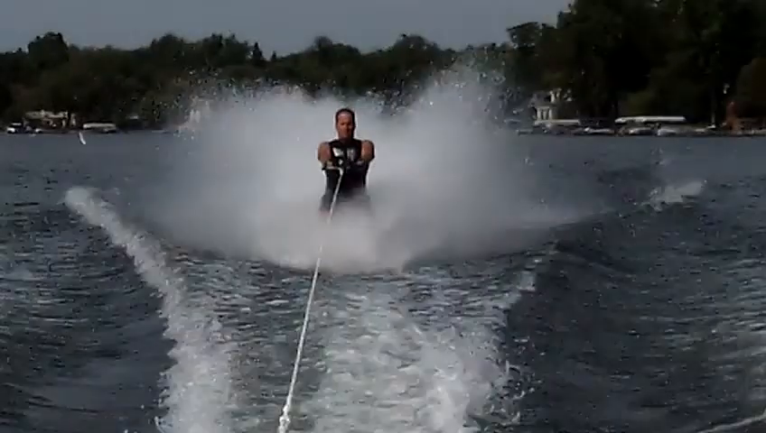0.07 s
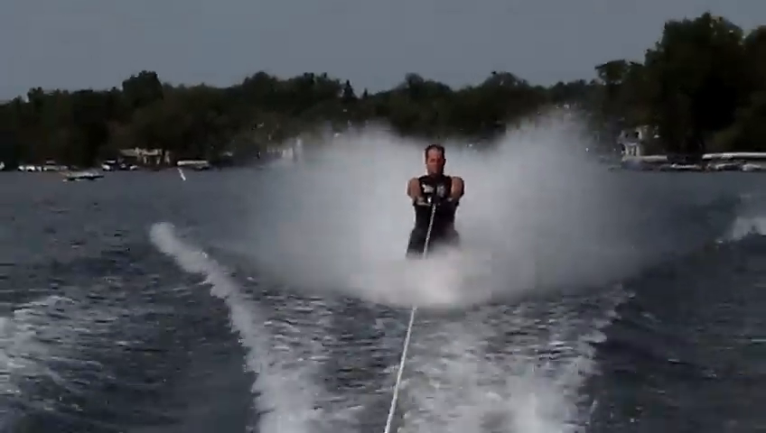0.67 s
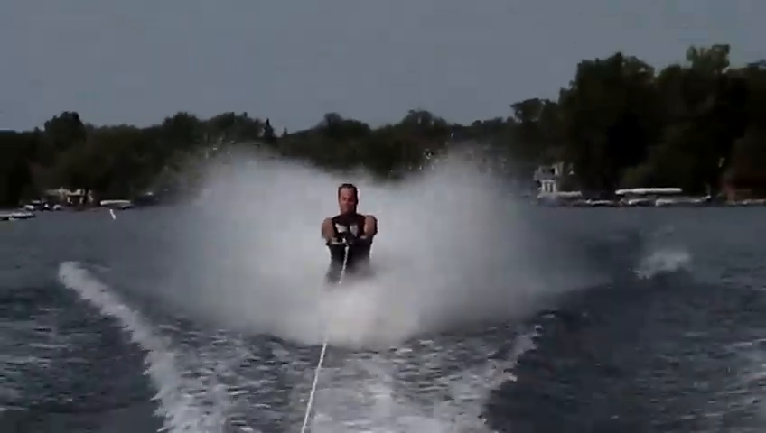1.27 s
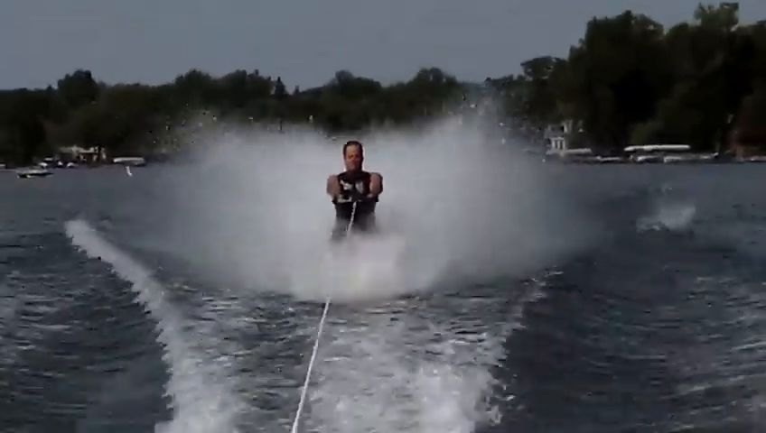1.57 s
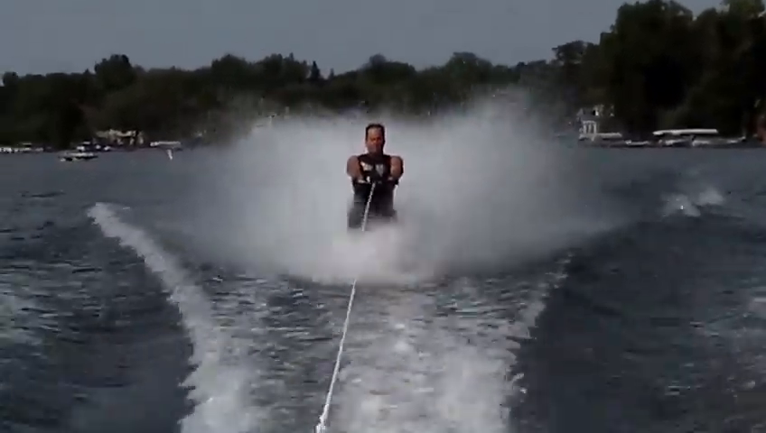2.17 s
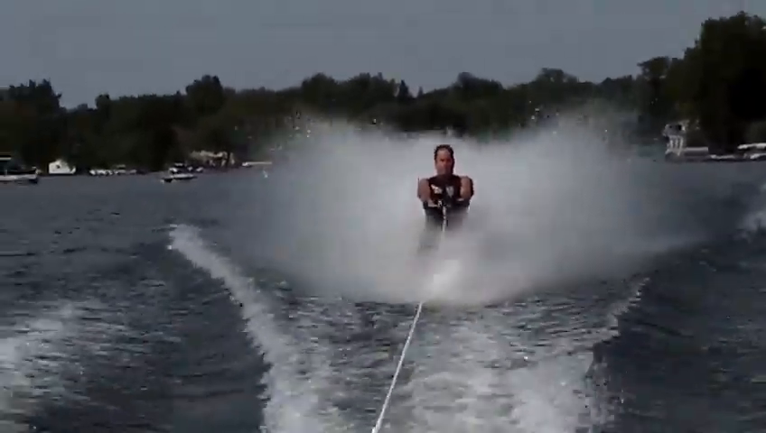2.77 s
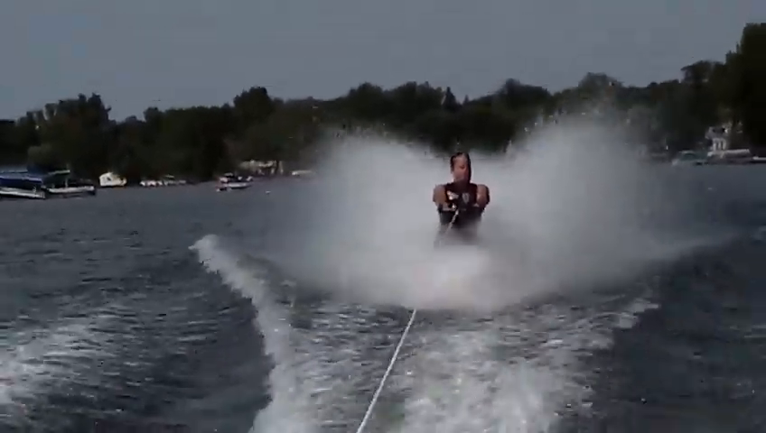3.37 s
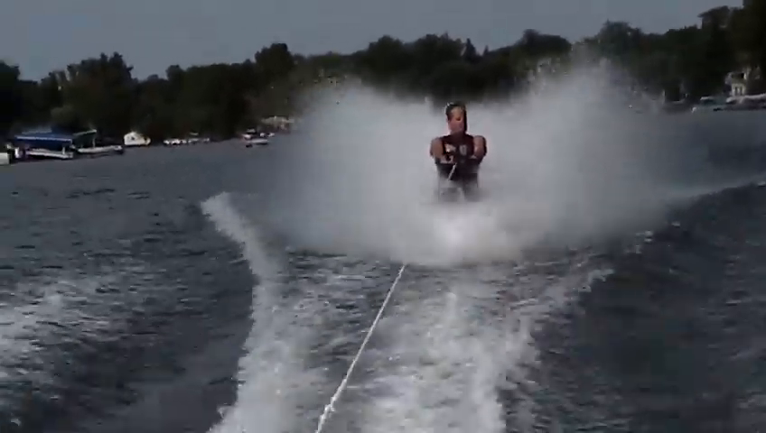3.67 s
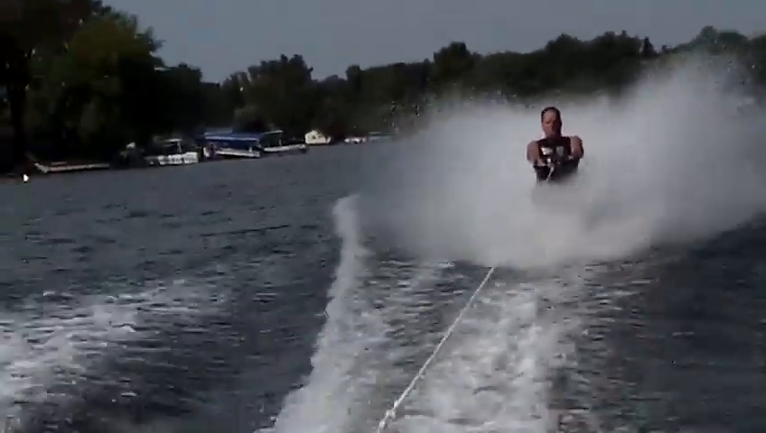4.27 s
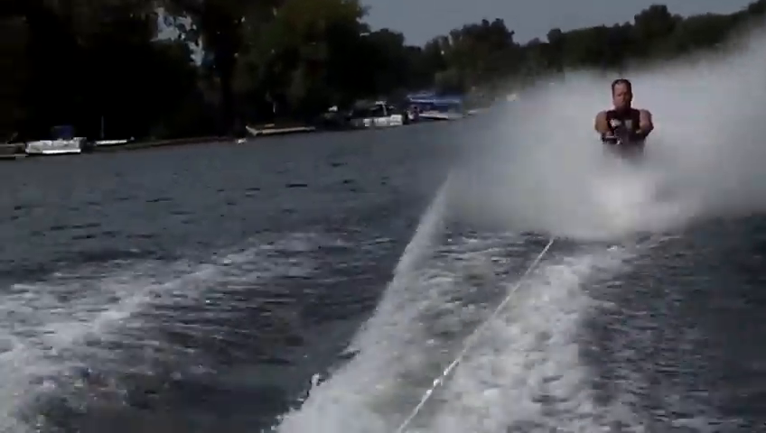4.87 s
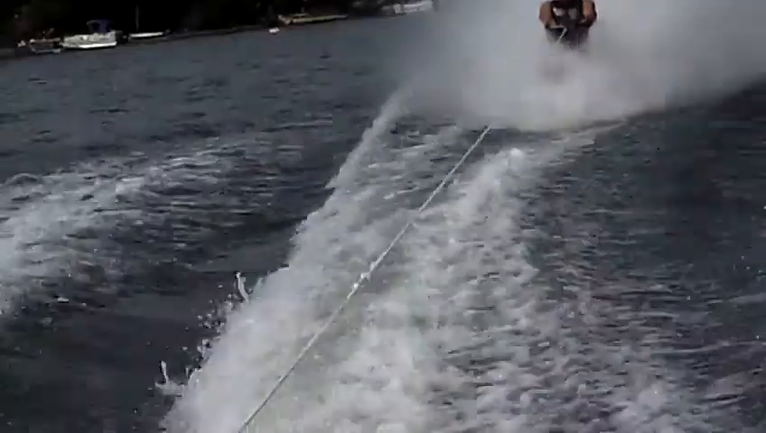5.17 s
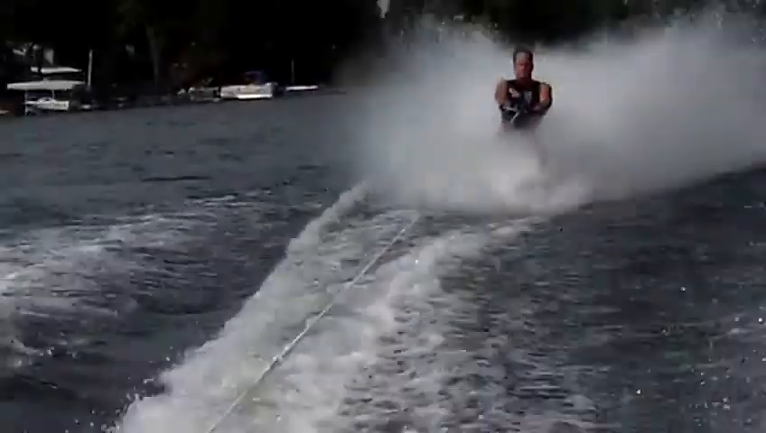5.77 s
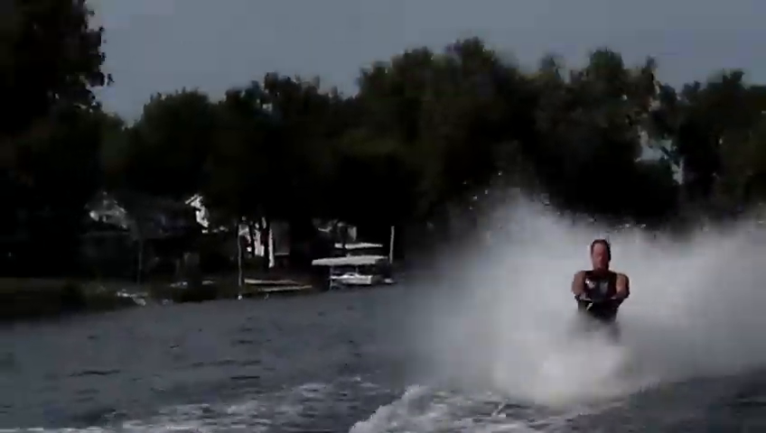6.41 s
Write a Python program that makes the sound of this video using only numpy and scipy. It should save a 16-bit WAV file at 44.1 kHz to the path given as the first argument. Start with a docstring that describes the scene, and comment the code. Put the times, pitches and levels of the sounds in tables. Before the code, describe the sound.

Strong wind buffets and sputters on the microphone over a steadily droning tow boat engine and the rush of its wake.

```python
"""A tow boat crosses a lake at steady speed, heard by a microphone at the stern.
From the start the engine drones under the rush of the wake, and gusts buffet the microphone.
Their pressure swings pin it at its limit: the sound sputters, stalls for milliseconds and thuds back.
Near 1.7 s the exhaust hum peaks and the airstream stiffens; by 3 s the engine is a little softer.
Gusts, stalls and the slaps of sharp eddies go on in clusters to the end, at 6.4 s."""
import sys
import numpy as np
from scipy.fft import rfft, irfft, next_fast_len
from scipy.io import wavfile
from scipy.ndimage import uniform_filter1d, map_coordinates

SR = 44100
rng = np.random.default_rng(int(sys.argv[2]) if len(sys.argv) > 2 else 0)


def output_pcm(signal):
    """Save a mono or channel-first signal as 16-bit PCM at the path in sys.argv[1].

    Samples are clipped to [-1, 1] before scaling.
    """
    pcm = np.clip(np.atleast_2d(signal).T, -1, 1) * 32767
    wavfile.write(sys.argv[1], SR, np.round(pcm).astype(np.int16))


N = 284004

# distinct single overloads of the microphone: centre t/s, length/s
STALLS = [(0.104, 0.008), (0.35, 0.008), (0.387, 0.004), (0.404, 0.008), (0.418, 0.009), (0.579, 0.004),
          (0.644, 0.006), (0.664, 0.006), (0.716, 0.005), (0.862, 0.006), (0.883, 0.012), (0.986, 0.005),
          (1.0, 0.004), (1.04, 0.008), (1.064, 0.007), (1.075, 0.005), (1.113, 0.005), (1.202, 0.006),
          (1.222, 0.012), (1.256, 0.019), (1.282, 0.012), (1.301, 0.009), (1.339, 0.005), (1.484, 0.005),
          (1.604, 0.006), (1.711, 0.003), (1.732, 0.004), (2.005, 0.007), (2.037, 0.01), (2.219, 0.011),
          (2.233, 0.005), (2.248, 0.006), (2.269, 0.008), (2.394, 0.004), (2.433, 0.005), (2.457, 0.017),
          (2.533, 0.01), (2.573, 0.01), (2.588, 0.004), (2.607, 0.012), (2.79, 0.004), (2.799, 0.01),
          (2.928, 0.009), (2.984, 0.009), (3.009, 0.004), (3.02, 0.005), (3.032, 0.01), (3.094, 0.004),
          (3.105, 0.009), (3.159, 0.01), (3.175, 0.01), (3.196, 0.007), (3.211, 0.011), (3.483, 0.009),
          (3.497, 0.007), (3.524, 0.006), (3.593, 0.005), (3.693, 0.004), (3.742, 0.006), (3.765, 0.012),
          (3.83, 0.011), (3.849, 0.004), (3.86, 0.006), (3.872, 0.007), (3.888, 0.015), (3.915, 0.006),
          (3.927, 0.009), (3.938, 0.007), (3.995, 0.017), (4.069, 0.007), (4.08, 0.004), (4.207, 0.005),
          (4.226, 0.003), (4.245, 0.005), (4.306, 0.007), (4.364, 0.008), (4.386, 0.014), (4.432, 0.008),
          (4.49, 0.005), (4.517, 0.01), (4.529, 0.01), (4.591, 0.005), (4.722, 0.003), (4.792, 0.008),
          (4.815, 0.011), (4.832, 0.011), (4.873, 0.004), (4.901, 0.005), (4.919, 0.008), (5.041, 0.006),
          (5.084, 0.012), (5.202, 0.007), (5.239, 0.01), (5.349, 0.006), (5.368, 0.006), (5.444, 0.005),
          (5.471, 0.009), (5.495, 0.018), (5.652, 0.004), (5.72, 0.004), (5.732, 0.004), (5.834, 0.008),
          (5.865, 0.005), (6.087, 0.009), (6.104, 0.005), (6.122, 0.004), (6.22, 0.008), (6.257, 0.009),
          (6.332, 0.004), (6.36, 0.01), (6.405, 0.008)]
# spectral density of the sharpest eddies' spitting: f/Hz, relative level/dB
SPIT_SPECTRUM = [(600, -16), (2000, 11), (4000, -7), (7000, -15.5), (11000, -20.5), (16000, -22.5)]


def amp(db):
    """The amplitude ratio of a level in decibels."""
    return 10 ** (np.asarray(db) / 20)


def unit(x):
    """Normalisation to an overall rms of 1."""
    return x / np.sqrt(np.mean(x ** 2) + 1e-20)


def even(x, span_s=0.01):
    """Division by the envelope holds the short-time rms near 1."""
    power = uniform_filter1d(x ** 2, max(int(span_s * SR), 2))
    return x / np.sqrt(np.abs(power) + 1e-9)


def clock():
    """The time t/s of every sample."""
    return np.arange(N) / SR


def around(s, reach_s):
    """The samples within reach_s of time s."""
    return slice(max(int((s - reach_s) * SR), 0), int((s + reach_s) * SR))


def curves(rows):
    """Linear interpolation: one value per sample for each column after the time."""
    times, *columns = np.transpose(rows)
    return [np.interp(clock(), times, column) for column in columns]


def swell(s, length):
    """A half-cosine window from 0 to 1 and back, centred on time s."""
    return np.cos(np.pi * np.clip((clock() - s) / length, -.5, .5))


def wobble(rate):
    """Smooth random modulation: a spline through rate Gaussian knots a second."""
    return map_coordinates(rng.standard_normal(4096), [clock() * rate], mode="wrap")


def scattered(rate_db, draws):
    """Inverse-transform sampling: uniform draws become times that crowd where the rate is high."""
    cumulative = np.cumsum(amp(rate_db))
    return np.interp(draws, cumulative / cumulative[-1], clock())


def filtered(x, response):
    """Linear filtering: the spectrum of x times a complex frequency response."""
    size = next_fast_len(N + 8192)
    return irfft(rfft(x, size) * response(np.fft.rfftfreq(size, 1 / SR)), size)[:N]


def noise(spectrum):
    """Spectral shaping of white noise to rows of f/Hz, relative level/dB; the rms is 1."""
    f, db = np.transpose(spectrum)
    shape = lambda hz: amp(np.interp(np.log(hz + 1), np.log(f), db))
    return unit(filtered(rng.standard_normal(N), shape))


def wake(level_db=-35.0, surge_db=0.62, froth_db=1):
    """Incoherent sources sum to noise: churned water rushes, and collapsing foam makes it flicker."""
    # spectral density of churned water: f/Hz, relative level/dB
    water_spectrum = [(60, -24.5), (200, 3), (500, 2), (900, 0), (1400, -3.5), (1900, -10), (3000, -15.5),
                      (4500, -22.5), (6500, -35), (9000, -41.5), (12000, -48.5), (16000, -47)]
    return amp(level_db + surge_db * wobble(3.19) + froth_db * wobble(70)) * noise(water_spectrum)


def engine(shaft_hz=68.35, drift=0.00094, whine_db=1.0, drone_db=-37, flutter_db=-0.3):
    """Engine orders: exhaust, whine and drone lock to one shaft, whose speed wanders with the load."""
    # course of the three parts: t/s, exhaust gain/dB, whine gain/dB, drone gain/dB
    gains = [(0, 0, 4, 5), (1.7, 2.5, 2.5, 3.5), (3.0, -2, 1, -1), (6.44, -3, 1, -1)]
    # exhaust partials of six cylinders firing three times a turn: shaft order, level/dB
    exhaust_orders = [(3, -25.5), (6, -40), (9, -49.5), (10, -53), (11, -48), (13, -52.5)]
    # partials of the mechanical whine: shaft order, level/dB
    whine_orders = [(12.5, -61.5), (16, -53.5), (17, -65.5), (17.5, -62.5), (18.5, -63), (19.5, -59),
                    (20, -53), (20.5, -53.5), (22, -56)]
    exhaust_gain, whine_gain, drone_gain = curves(gains)
    turns = np.cumsum(shaft_hz * (1 + drift * wobble(5.02))) / SR

    def tone(order):
        """An amplitude-modulated sinusoid at a multiple of the shaft frequency."""
        flutter = amp(flutter_db * wobble(23))
        return flutter * np.sqrt(2) * np.sin(2 * np.pi * (order * turns + rng.random()))

    exhaust = amp(exhaust_gain) * sum(amp(db) * tone(order) for order, db in exhaust_orders)
    whine = amp(whine_gain + whine_db) * sum(amp(db) * tone(order) for order, db in whine_orders)
    drone = amp(drone_gain + drone_db) * tone(order=8)
    return exhaust + whine + drone


def airflow(surge_db=2.5):
    """Unsteady flow: gusts and surges on the airstream set the gain/dB of large and of small eddies."""
    # airstream between gusts: t/s, relative level/dB
    airstream = [(0, -3), (.85, -3), (1.7, 1.5), (2.25, -2), (3.1, 1), (3.65, -1.5), (4.4, 1.03),
                 (5.0, 0.62), (5.55, -1), (6.0, 1), (6.44, 1)]
    # gusts that swell and fade: centre t/s, length/s, rumble rise/dB, turbulence rise/dB
    gusts = [(0.078, .12, 8.5, 10), (0.38, .08, 7, 10), (0.6, .2, 12, 9), (1.176, .17, 6, 10),
             (1.453, .11, 13.5, 7), (1.645, .22, 1.5, 1.5), (2.113, .06, -3, 12.5), (2.364, .1, 4.5, 12),
             (2.733, .16, 5.5, 7.5), (2.889, .1, 6, 4), (3.018, .16, 4.5, 3.5), (3.274, .22, 5, 3),
             (3.427, .08, 6.5, 3), (3.52, .13, 7, 6.5), (3.801, .1, 7.5, 12), (4.253, .07, 7.5, 6),
             (4.36, .15, 5, 5), (4.465, 0.073, 2.5, 5.5), (4.707, .2, 1, 3), (5.103, .16, 4.5, 4),
             (5.313, .08, 10.5, 8), (5.406, .08, 6.5, 7), (5.76, .17, 3, 6), (6.014, .17, 6.5, 7),
             (6.216, .08, 6.5, 5), (6.327, .1, 9, 5)]
    # surges that stir all eddies at once: centre t/s, length/s, strength (0-1)
    surges = [(0.4, 0.12, 0.6), (0.656, .07, 0.99), (1.014, 0.079, 1), (1.249, 0.095, 0.86),
              (2.015, .06, 0.64), (2.239, 0.045, 0.96), (2.582, 0.23, 0.59), (3.016, 0.063, 1),
              (3.183, .08, 0.92), (3.491, 0.06, 0.82), (3.886, .23, 1), (4.386, .15, .6), (4.822, .08, .7),
              (4.906, .06, 0.4), (5.225, 0.083, 0.78), (5.467, 0.085, .9), (5.743, .04, 0.7),
              (6.223, 0.096, 0.95)]
    steady, = curves(airstream)
    stirred = surge_db * sum(strength * swell(s, length) for s, length, strength in surges)
    gusting = sum(np.outer(rises, swell(s, length)) for s, length, *rises in gusts)
    return steady + stirred + gusting


def wind(rumble_db=-9.0, turbulence_db=-32, spit_db=-70, lumps_db=5.0, flurry_db=1.5, scatter_db=5):
    """Turbulent pressure: large eddies rumble, small ones come in flurries, and the sharpest spit."""
    # spectral densities of the large and the small eddies: f/Hz, relative level/dB
    rumble_spectrum = [(8, -2), (20, 15), (35, 11), (60, 10.5), (120, 3), (200, -4), (320, -9), (600, -22),
                       (1500, -74.5), (5000, -110)]
    turbulence_spectrum = [(60, -44.5), (160, -16), (280, -8), (450, -7.5), (700, -13), (1200, -32),
                           (2500, -35), (6000, -75), (16000, -99)]
    large_gain, small_gain = airflow()
    lumps = lumps_db * np.minimum(wobble(45), 1)
    flicker = np.minimum(wobble(260), 2)
    rumble = unit(amp(lumps) * even(noise(rumble_spectrum), span_s=0.073))
    flurries = unit(amp(lumps + flurry_db * flicker) * noise(turbulence_spectrum))
    spit = unit(amp(scatter_db * flicker) * noise(SPIT_SPECTRUM))
    return (amp(large_gain + rumble_db) * rumble
            + amp(small_gain + turbulence_db) * flurries
            + amp(small_gain + spit_db) * spit)


def stutters(pressure, count=62, mean_length_s=.0018):
    """Brief overloads on pressure crests between stalls, mostly in gusts: centre t/s, length/s."""
    t = clock()
    when, size = rng.random((count, 2)).T
    swing = np.abs(uniform_filter1d(pressure, size=SR // 200))
    times = scattered(1.5 * airflow()[1], (np.arange(count) + when) / count)
    windows = [around(s, .004) for s in times]
    crests = np.array([t[near][np.argmax(swing[near])] for near in windows])
    centres, lengths = np.transpose(STALLS)
    between_stalls = np.all(np.abs(crests[:, None] - centres) > lengths / 2 + mean_length_s, axis=1)
    return np.column_stack([crests, mean_length_s * (.5 + size)])[between_stalls]


def overloaded(pressure, limit=0.57, push=1.7, ramp_s=.00326, lead_s=.001147, dull_db=-32, dull_hz=450):
    """Saturation: slow swings carry the pressure past the limit and choke what rides on them."""
    t, driven = clock(), pressure.copy()
    side, released = 1, -1
    for s, length in sorted(map(tuple, np.vstack([stutters(pressure), STALLS]))):
        near = around(s, .025)
        nearness = np.clip(1 - (np.abs(t[near] - s) - length / 2 + lead_s) / ramp_s, 0, 1)
        grip = np.sin(np.pi / 2 * nearness) ** 2
        slow = uniform_filter1d(driven[near], size=SR // 400)
        gap_s = s - length / 2 - released
        # just after a stall the pressure rebounds to the other limit; else it goes the way it leans
        side = -side if .003 < gap_s < .008 else np.sign(np.sum(grip * slow))
        driven[near] += grip * (side * push * limit - slow)
        released = s + length / 2
    # a faint low-passed copy of the sound is added, so stalls are not fully silent
    dull_copy = amp(dull_db) * filtered(pressure, lambda hz: 1 / (1 + (hz / dull_hz) ** 2))
    return np.clip(driven, -limit, limit) + dull_copy


def small_eddies(thump_db=-15, burst_db=-28, snap_db=-21, scatter_db=8, count=40):
    """Intermittency: weak eddies strike at random, mostly in gusts: t/s, thump/dB, burst/dB, snap/dB."""
    when, size, sharpness = rng.random((count, 3)).T
    times = scattered(2 * airflow()[1], (np.arange(count) + when) / count)
    size_db = scatter_db * (size - .5)
    sharpness_db = 2 * scatter_db * (sharpness - .5)
    return np.column_stack([times, thump_db + size_db, burst_db + size_db, snap_db + sharpness_db])


def buffets(pressure, thump_db=-3, burst_db=1, slap_db=10, snap_db=-3, rasp_db=-29):
    """Eddies break on the microphone port as pressure pulses: the shorter, the wider the spectrum."""
    # impacts of the sharpest eddies: t/s, relative level/dB of thump, of burst and of snap
    impacts = [(.089, 6, -19, -16), (.377, 4, -18.5, -12.5), (.538, -4, -24, -21), (.574, -13, -18, -21.5),
               (.586, 4.5, -26.5, -17), (.634, -1, -19.5, -13), (1.022, 7.5, -21.5, -13),
               (1.095, -14, -20.5, -9), (1.122, 2.5, -21.5, -24.5), (1.183, 1, -17, -24),
               (1.193, -4, -24.5, -25), (1.331, -13, -20.5, -24.5), (1.427, -1, -18.5, -12),
               (1.461, 5, -29.5, -17.5), (1.47, 5, -27.5, -13), (1.548, 9, -20.5, -18),
               (1.591, 5, -21, -14), (1.618, 1, -28, -15.5), (1.632, -6, -19, -14),
               (1.719, 7.5, -19.5, -8.5), (2.111, 4.5, -13.5, -12), (2.357, -2.5, -13, -14.5),
               (2.663, -3, -20.5, -16), (2.701, 2, -25, -20.5), (2.735, 0, -22, -21), (2.759, 8, -19, -12),
               (2.772, -3.5, -16.5, -13), (2.957, -22, -20.5, -14.5), (2.995, 3, -22.5, -30),
               (3.014, -11, -24, -17.5), (3.064, 3.5, -29, -18.5), (3.135, -8, -21, -13.5),
               (3.166, 5.5, -21, -10.5), (3.185, 5.5, -27, -20), (3.229, -2, -23.5, -19),
               (3.31, 5, -25, -15), (3.534, 2, -22.5, -12.5), (3.555, 4.5, -17.5, -18),
               (3.736, 3.5, -23.5, -13.5), (3.785, 6.5, -18, -5.5), (3.793, -13.5, -15.5, -28),
               (3.805, 11, -26, -9), (3.933, 3.5, -22.5, -10), (4.115, 5.5, -22.5, -13),
               (4.233, 4.5, -15.5, -7.5), (4.353, 4, -18, -26), (4.397, 6.5, -23.5, -20.5),
               (4.477, -5, -20, -20.5), (4.617, 8, -21, -18), (4.682, 1, -18, -14), (4.699, -8, -20, -27),
               (4.714, -7.5, -21.5, -9.5), (4.768, 3.5, -19.5, -10.5), (4.878, 4.5, -18.5, -11),
               (5.018, 4, -24, -12), (5.319, -6, -23, -12.5), (5.392, -2, -22, -20.5),
               (5.404, 1.5, -20, -23), (5.686, 7, -22, -17), (5.726, 2.5, -19.5, -8.5),
               (5.793, 1.5, -18.5, -13), (5.964, 3, -26.5, -29), (5.995, -1, -13.5, -17.5),
               (6.041, 0, -18, -14.5), (6.059, 2, -21.5, -15.5), (6.113, -3.5, -26, -14),
               (6.149, 7, -22.5, -16), (6.213, 5, -22, -18.5), (6.24, 5.5, -16.5, -13.5),
               (6.32, 3.5, -25.5, -13), (6.341, -4.5, -18.5, -21)]
    # spectral density of a breaking eddy: f/Hz, relative level/dB
    burst_spectrum = [(150, -17), (400, 18.5), (700, 7.5), (1100, -10.5), (1700, -12.5), (2500, -36),
                      (6000, -48.5), (16000, -58)]
    burst_s, thump_s, slap_s, snap_s, tip_s = .0017, .00087, .00024, .00015, .000015  # pulse widths
    t, jolts = clock(), np.zeros(N)
    rough, rasp = even(noise(burst_spectrum)), even(noise(SPIT_SPECTRUM))
    for s, thump_level, burst_level, snap_level in np.vstack([impacts, small_eddies()]):
        near = around(s, .03)
        lag = t[near] - s
        breakup = amp(burst_level + burst_db) * rough[near] + amp(snap_level + rasp_db) * rasp[near]
        burst = breakup * np.exp(-.5 * (lag / burst_s) ** 2)
        thump = amp(thump_level + thump_db) * np.exp(-.5 * (lag / thump_s) ** 2)
        slap = amp(burst_level + slap_db) * lag / slap_s * np.exp(-.5 * (lag / slap_s) ** 2)
        snap = amp(snap_level + snap_db) * np.exp(-np.hypot(lag, tip_s) / snap_s)
        # the pulse pushes against the standing pressure
        side = np.sign(np.interp(s, t[near], pressure[near]))
        jolts[near] += burst - side * (thump + slap + snap)
    return jolts


def scene():
    """Superposition at one microphone, which saturates; sharp eddies jolt it even when it is pinned."""
    pressure = overloaded(wake() + engine() + wind())
    fade = np.clip(np.minimum(clock(), clock()[::-1]) / .012, 0, 1)  # 12 ms at each end
    return (fade * (pressure + buffets(pressure)))[None]


def record(dry, cut_hz=120, notch_hz=7680, notch_width_hz=260, hiss_db=-82, ceiling=.71, top_hz=16100):
    """A high-pass wind filter's step response turns each stall into a thud; peaks are softly clipped."""
    wind_filter = lambda hz: hz ** 2 / (hz ** 2 - cut_hz ** 2 - 1j * np.sqrt(2) * cut_hz * hz)
    notch = lambda hz: 1 - .6j * hz * notch_width_hz / (notch_hz**2 - hz**2 + 1j * hz * notch_width_hz)
    x = filtered(dry[0], lambda hz: wind_filter(hz) * notch(hz))
    x = x + amp(hiss_db) * noise([(100, 0), (16000, -30)])  # faint steady hiss under everything
    x = x / (1 + np.abs(x / ceiling) ** 14) ** (1 / 14)
    return filtered(x, lambda hz: hz < top_hz)[None]


dry = scene()
out = record(dry)
output_pcm(out)
```